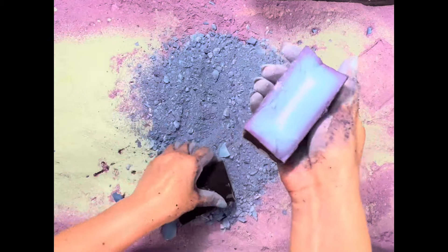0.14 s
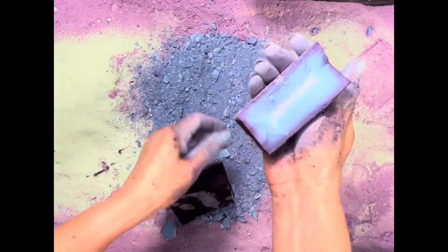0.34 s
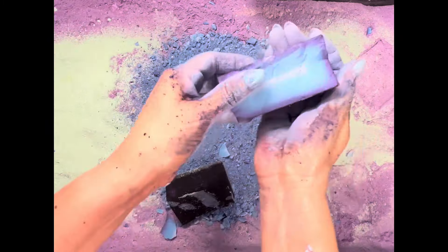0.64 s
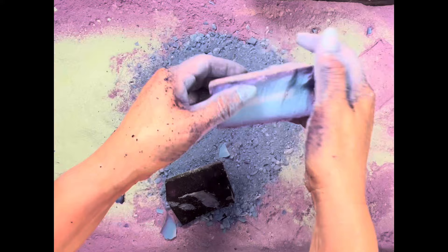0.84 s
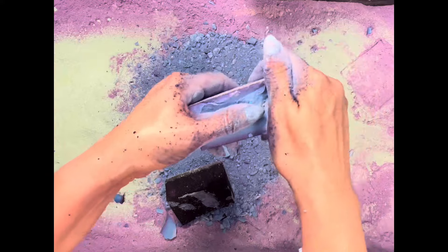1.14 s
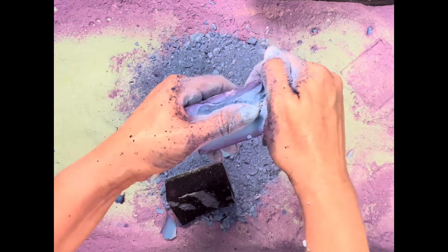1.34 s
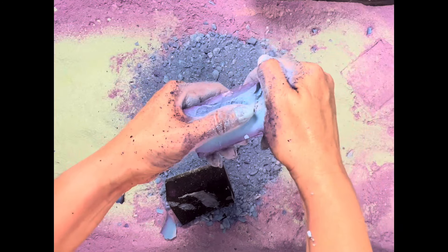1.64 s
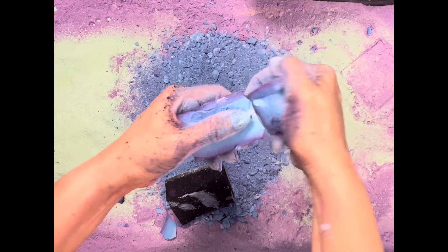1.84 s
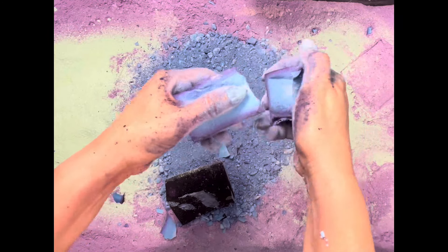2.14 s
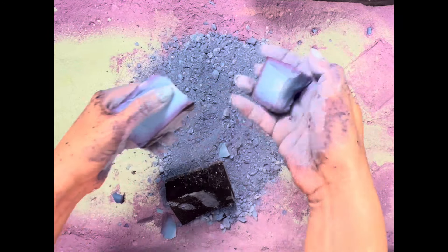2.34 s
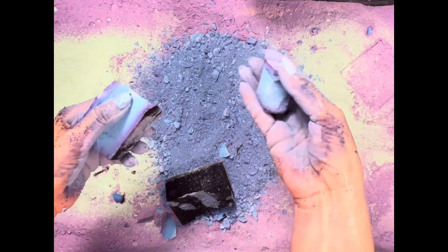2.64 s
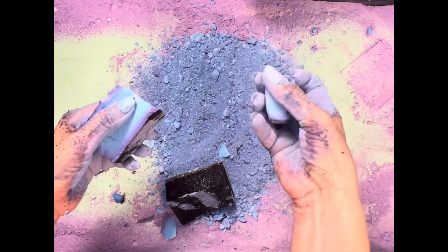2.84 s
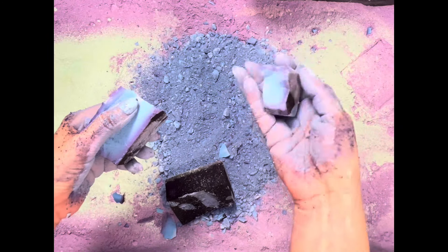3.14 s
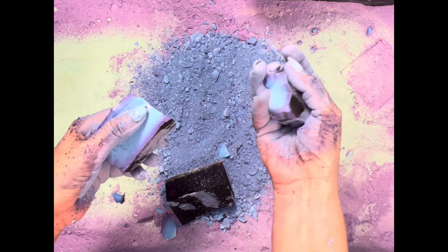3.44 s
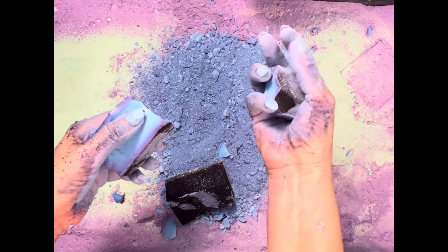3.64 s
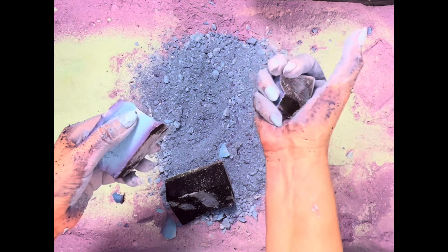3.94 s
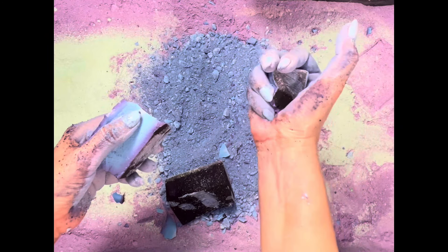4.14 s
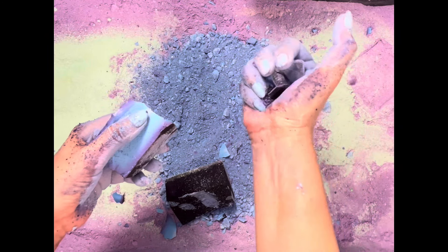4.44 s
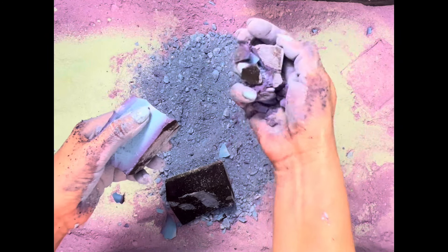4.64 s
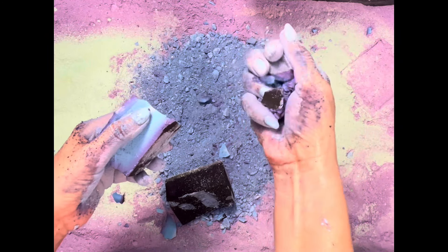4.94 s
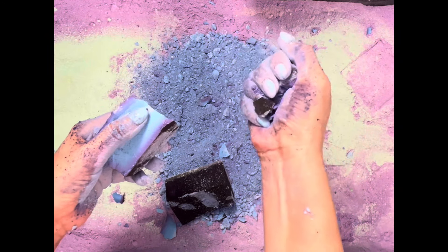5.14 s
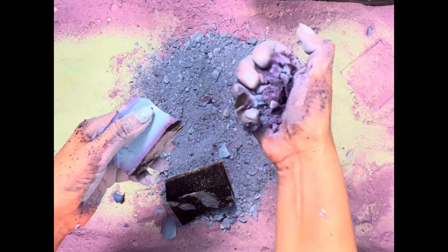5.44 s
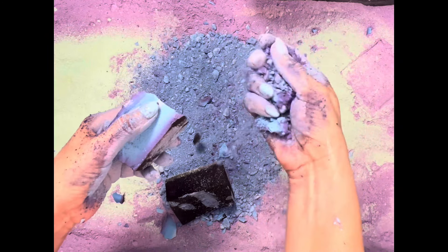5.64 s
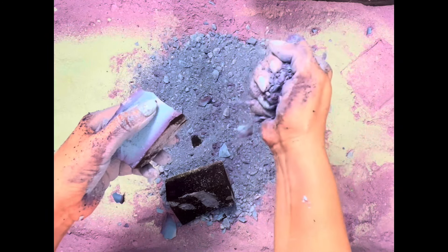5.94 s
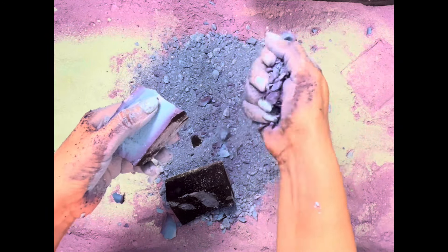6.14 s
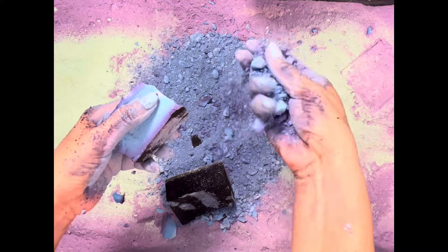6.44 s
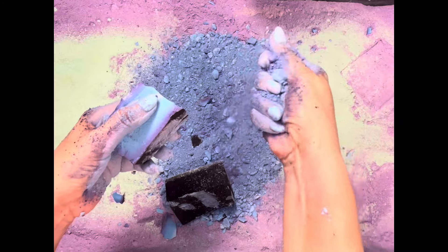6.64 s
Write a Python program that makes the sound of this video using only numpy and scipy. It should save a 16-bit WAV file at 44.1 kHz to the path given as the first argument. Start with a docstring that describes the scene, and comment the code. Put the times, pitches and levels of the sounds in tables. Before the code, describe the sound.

Dry chalk block rubbed by dusty fingers, cracked and loudly snapped in two, then crushed in a fist to gritty crumbs over low electrical hum.

```python
"""Chalk block snapped and crushed

Hands rub a dry block of gym chalk until it rings, snap it in two and crush one half in a fist.
Noise bursts make the breaks, filtered jolts the cracks, showers of tiny grains the crumbs, and
narrow-band tones the ringing chalk. The big breaks overload the microphone and wake a small room;
an electrical hum lies over low rumble and faint hiss."""
import sys
import numpy as np
from scipy import signal
from scipy.fft import rfft, irfft
from scipy.io import wavfile

SR = 44100
rng = np.random.default_rng(int(sys.argv[2]) if len(sys.argv) > 2 else 0)


def to_wav(sig):
    """Store sig (one row per channel, or 1-D mono) as 16-bit WAV at the path in sys.argv[1].

    Samples outside -1..1 are clipped; the rate is SR.
    """
    pcm = np.clip(np.atleast_2d(sig), -1, 1) * 32767
    pcm = np.round(pcm).astype(np.int16)
    wavfile.write(sys.argv[1], SR, pcm.T)  # frames by channels


N = 299880

# the block gives way: (time [s], level [dB], length [s], centre [Hz])
BREAKS = [(1.771, -15, 0.021, 6000), (1.777, -0.5, 0.01, 4260), (1.78, 9, 0.0056, 1530),
          (1.795, -4, 0.0027, 1460), (4.141, 6, 0.0017, 3100), (4.1454, 5, 0.0039, 2050),
          (4.152, 8, 0.00095, 3750), (4.915, -17.5, 0.019, 2250)]
# single cracks that stand out, all lifted later by CRACK_LIFT_DB:
# (time [s], level at 2-7 kHz [dB], lows relative to that [dB], highs relative to that [dB])
CRACKS = [(1.1523, -17, -18, -0.5), (1.1617, -32, -16, -10), (1.192, -32, -21, 4), (1.2, -22.5, -5, 7.5),
          (1.343, -22.5, -21, -2), (1.3751, -21, -20, -10), (1.4401, -29.5, -14, -5),
          (1.4676, -10, 1.5, -18), (1.4714, -2.5, -16, 0.5), (1.484, -17, -35, -5), (1.4946, -11, -26, 3),
          (1.4983, -15, -20, -12), (1.6278, -14, -14.5, -4), (1.66, -29, -20, 8),
          (1.6684, -22.5, -10.5, -24), (1.6753, -19, -5, -4), (1.7493, -27.5, -13, 4), (1.765, -5, -9, -1),
          (2.284, -32.5, -3, -3), (2.739, -23, -17, 0), (2.925, -41, -13, -4), (3.2055, -28, -11.5, -18),
          (3.2237, -29.5, -13, -9), (3.721, -19.5, -19, -4.5), (3.7372, -16.5, -17, -2),
          (3.8073, -22.5, -23, 0), (3.8259, -22.5, -19, 3), (3.9015, -17, -7, -4.5),
          (3.9234, -5.5, -13, -8.5), (4.0416, -24, -1, 2.5), (4.0491, -4.5, -17.5, -12.5),
          (4.1001, -13, -16.5, -5), (4.1603, -8.5, -9.5, 0), (4.202, -24, -2, -6),
          (4.2307, -7.5, -18, -5.5), (4.27, -22.5, -16.5, -11), (4.278, -24, -11.5, 5),
          (4.3068, -28.5, 3, 14.5), (4.7348, -27.5, -19, 1), (4.77, -31, -29, -1), (4.8212, -30, -1, -12),
          (4.8404, -25.5, -1, -19), (4.901, -14, -8, 1), (4.925, -18, -1, 5), (4.942, -23, -8, -20),
          (4.9873, -17, -9, 1), (5.003, -13, -21.5, -19), (5.0373, -6, -23, -12.5), (5.0558, -27, -18, -21),
          (5.1005, -5.5, -19, -24), (5.118, -10.5, -20, -28), (5.151, -24.5, -11.5, -7),
          (5.1593, -25.5, -18, -11), (5.2019, -16, -16, 7), (5.367, -36.5, -6, -1), (5.5727, -21, -8, -14),
          (5.593, -35, -7, -9), (5.619, -32, 1, -10), (5.645, -38, -8, -5), (5.787, -11, -10, 3.5),
          (5.809, -25, -29, -3), (5.835, -17, -19.5, 4), (5.9695, -27.5, -5.5, -16), (6.007, -16, 0, -4.5),
          (6.029, -32, -10, -20), (6.062, -36, -4, -15), (6.079, -33.5, -4, -16), (6.1252, -21.5, -13, 9),
          (6.146, -31, 0, -17), (6.2796, -19.5, 2, -18), (6.3075, -21, -20, -10), (6.35, -17.5, -2.5, -7),
          (6.388, -29, -15, -5), (6.5603, -25.5, -17, 8.5), (6.5898, -26, 4, -31), (6.6429, -22, -1, -13),
          (6.7756, -32.5, -7, -14)]
CRACK_LIFT_DB = 2.0
# squeezes of the fist; one whose end comes before its start is silent:
# (start [s], hardest [s], end [s], level [dB], swell [dB])
SQUEEZES = [(3.78, 3.83, 4.02, -31, 13), (4.058, 4.22, 4.35, -28.5, 14), (4.656, 4.932, 5.25, -29, 12),
            (5.314, 5.378, 5.42, -38.5, 15), (5.495, 5.624, 5.77, -30.5, 13), (5.731, 5.775, 5.81, -35, 6),
            (5.866, 5.894, 5.7, -31, 12), (6.267, 6.56, 6.74, -31.5, 9.5)]
# low crunch of the finer crumbs, ahead of the grinding mix: (time [s], level [dB])
CRUMBLING = [(3.5, -46), (4.3, -13), (4.8, -5), (6.1, 0.5), (6.8, 4.5)]
# fingers stroking the chalk: (start [s], length [s], level [dB], how freely the piece rings [0-1])
STROKES = [(0, 0.083, -36.5, 0), (0.124, 0.037, -39.5, 0.05), (0.334, 0.28, -43, 0.4),
           (0.693, 0.1, -29, 0.26), (0.825, 0.039, -32.5, 0.4), (0.894, 0.035, -32.5, 0.15),
           (0.957, 0.08, -34, 0.07), (1.042, 0.057, -29, 0), (1.95, 0.036, -34, 0.05),
           (2.029, 0.052, -28.5, 0), (2.246, 0.037, -36, 0), (2.366, 0.11, -42, 0.02),
           (2.593, 0.13, -30, 0.1), (2.75, 0.14, -34.5, 0.85), (2.988, 0.023, -24, 1),
           (3.008, 0.18, -39, 0.83), (3.23, 0.072, -22.5, 0.44), (3.324, 0.16, -42, 0.85),
           (3.556, 0.042, -28, 0.08), (4.441, 0.09, -31.5, 0.01), (4.601, 0.096, -33, 0)]
# a fingertip catches on an edge and lets go: (time [s], level [dB])
CATCHES = [(0.292, -39), (0.325, -33), (0.547, -29.5), (0.6935, -26.5), (2.0985, -28), (2.3148, -33),
           (2.336, -43), (2.462, -28), (2.5098, -26), (2.625, -27), (2.9835, -28.5), (3.067, -30),
           (3.393, -40)]
# the broken half skids on the skin: (time [s], level [dB], length [s])
SKIDS = [(2.679, -8, 0.025), (2.722, -17.5, 0.016), (2.736, -19, 0.037)]
# the half lies loose on the fingers and its lowest mode sounds: (start [s], end [s])
LOOSE_SPELLS = [(2.1, 2.22), (2.37, 2.52), (2.96, 3.15)]
# resonances of the whole block, then of the half: (frequency [Hz], width [Hz], relative level [dB])
WHOLE_MODES = [(3010, 62, -5.5), (4000, 180, -3.5), (5200, 110, -6.5), (5870, 220, 2.5), (6370, 170, 3),
               (8480, 300, -3.5)]
HALF_MODES = [(6620, 330, -3), (7960, 400, -2), (8800, 400, -10), (11500, 3700, -2)]
# the half's strongest resonance bends as the grip changes: (time [s], frequency [Hz])
SQUEAK_BEND = [(2.66, 4970), (2.79, 4810), (2.93, 4920), (3.25, 5010)]
# dull knocks of the hands, the lumps and the table:
# (time [s], level before rise and decay [dB], pitch [Hz], rise [s], decay [s])
THUMPS = [(.005, -16.5, 38.6, 0.0098, 0.11), (0.496, -11.5, 540, 0.000089, 0.00061),
          (1.783, 6.5, 148, 0.0014, 0.0034), (4.087, -9, 34.6, 0.014, 0.036),
          (4.147, 10, 102, 0.00096, 0.0058), (5.243, 4.5, 77, 0.012, 0.028), (5.374, 1.5, 82, 0.017, 0.013),
          (5.785, -8, 246, 0.00078, 0.0033), (6.28, -15.5, 475, 0.00076, 0.007)]

# spectra of the layers: (frequency [Hz], relative level per Hz [dB])
CRACK_COLOUR = [(60, -46), (300, 5), (800, -3), (2200, 0.5), (2650, -2.5), (5800, -1), (7500, 2.5),
                (10000, -6), (12000, -3), (15500, -8.5)]
GRIT_COLOUR = [(700, -14), (1500, -5.5), (2300, -4), (4500, -1.5), (5800, -6.5), (7500, -5), (10000, -12.5),
               (12500, -11.5), (15500, -22)]
CRUNCH_COLOUR = [(120, -19), (300, 1), (700, -1.5), (1500, -4.5), (2200, -7.5), (5000, -44)]
SKIN_COLOUR = [(300, 0), (1000, -7), (2500, -4), (4500, -2), (7000, 1.5), (10000, -6), (12000, -4),
               (15500, -7.5)]
RUSH_COLOUR = [(180, -43), (330, -9), (523, -2), (1370, -5), (2600, -10.5), (6840, -17), (15000, -29)]
ROOM_COLOUR = [(100, -8), (400, 16.5), (900, -14), (1450, -2.5), (2500, -4), (4600, -0.5), (7000, 1.5),
               (15500, 0)]
FLOOR_COLOUR = [(10, -0.5), (45, -1.5), (70, 0), (160, -9.5), (220, -14), (350, -24.5), (600, -29),
                (1100, -39.5), (2500, -43), (7000, -47), (15500, -50.5)]
# room decay by frequency: (frequency [Hz], time to fall 60 dB [s])
ROOM_T60 = [(200, 0.64), (1500, 0.48), (7000, 0.51), (15000, 0.24)]
# electrical hum: (frequency [Hz], rms level [dB])
HUM = [(58.5, -33), (120, -31.5), (240, -43.5), (294, -51)]

SNAP_S = 1.78  # from here on the hand holds one half of the block
GRIP_S = 0.0094  # the fingers take hold and let go in this time
# between squeezes the closed fist still stirs the crumbs faintly
FIST_FROM_S, FIST_REST_DB = 3.55, -46.5
# between strokes, until the fist closes, the fingers never rest entirely
HOLD_FROM_S, HOLD_DB = 0.18, -60.5
# how far through its length a stroke peaks, and the drop half a length from there
STROKE_PEAK, STROKE_ENDS_DB = 0.49, -9
CATCH_TICK_DB, CATCH_TICK_S, CATCH_DECAY_S, CATCH_RING = 6.5, 0.0019, 0.0081, 0.74
SQUEAK_WIDTH_HZ, SQUEAK_DB = 400, 5
LOW_MODE_HZ, LOW_MODE_WIDTH_HZ, LOW_MODE_DB = 1417, 130, -53
RUSH_DB, RUSH_RISE_S, RUSH_T60_S = -21.5, 0.0046, 0.51
# the ring within the rush, its level relative to the rush
RUSH_RING_HZ, RUSH_RING_WIDTH_HZ, RUSH_RING_DB = 1490, 190, -8
FLOOR_DB = -27.5
EDGE_HZ = 15850  # upper band limit


def breaks(fade_s=0.0011, slope_db=7, patchy_db=3, size=3000):
    """Each break is a noise burst for dense fractures, peaking at its centre and falling per octave."""
    out, t = np.zeros(N), np.arange(size) / SR
    for time, db, length, centre_hz in BREAKS:
        octaves_away = abs(np.log2((bins() + 50) / centre_hz))
        colour = -slope_db * octaves_away + patchy_db * fragment()
        # keep the middle of the filtered noise, where the filter has settled
        tear = unit(signal.fftconvolve(rng.standard_normal(2 * size), causal(colour))[size:2 * size])
        hold_then_fade = np.exp(-np.maximum(t - length, 0) / fade_s)
        add(out, time, amp(db) * tear * hold_then_fade)
    return out


def freed_halves(snaps):
    """The breaks set off the lowest bending mode of the freed halves."""
    return amp(3) * resonate(snaps, hz=1430, width_hz=150)


def cracks(run_s=0.00045, run_db=5, scatter_s=0.0053, scatter_db=-3, patchy_db=3.0, size=1500):
    """A crack starts with a jolt, tears on briefly, and scatters off the hands and the table."""
    out, t, hz = np.zeros(N), np.arange(size) / SR, bins()
    middle = signal.butter(2, [2000, 7000], "band", fs=SR, output="sos")
    for time, db, low_db, high_db in CRACKS:
        tear = rng.standard_normal(size) * np.exp(-t / run_s)
        scatter = rng.standard_normal(size) * np.exp(-t / scatter_s)
        force = amp(run_db) * tear / np.linalg.norm(tear)
        force += amp(scatter_db) * scatter / np.linalg.norm(scatter)
        force[0] += 1  # the jolt
        tilt = read([(150, low_db), (1300, low_db + 6.0), (4000, 0), (5200, 0), (10000, high_db)], hz)
        colour = read(CRACK_COLOUR, hz) + tilt + patchy_db * fragment()
        click = signal.fftconvolve(force, causal(colour))
        # mid-band energy, spread over 5 ms
        level = np.sqrt(np.sum(signal.sosfilt(middle, click) ** 2) / (.005 * SR))
        add(out, time, amp(db) * click / level)
    return amp(CRACK_LIFT_DB) * out


def hard_lump(clicks):
    """The last hard lump rings briefly each time it splits."""
    t = np.arange(N) / SR
    splitting = (t > 4.98) & (t < 5.18)
    return amp(-0.5) * resonate(clicks * splitting, hz=4330, width_hz=900)


def grinding():
    """Crumbs give way in the fist: sharp grit, soft powder, and a duller crunch from inside the palm."""
    t = np.arange(N) / SR
    pressure = sum(squeeze(*row) for row in SQUEEZES)
    pressure = np.maximum(pressure, amp(FIST_REST_DB) * (t > FIST_FROM_S))
    crunch_db = np.interp(t, *np.transpose(CRUMBLING))
    clumps = amp(2.5 * wander(N, 60))
    grit = amp(1.0) * grains(GRIT_COLOUR, per_s=420, spread_db=6.0, patchy_db=6.0, tear_s=0.00099)
    crunch = grains(CRUNCH_COLOUR, per_s=230, spread_db=3.0, patchy_db=5, tear_s=0.0017)
    powder = amp(-6.0) * noise(GRIT_COLOUR)
    return pressure * clumps * (grit + powder + amp(crunch_db - 4.0) * crunch)


def squeeze(start, hardest, end, db, swell_db):
    """Pressure builds steadily in dB to its hardest point, then eases off."""
    t = np.arange(N) / SR
    grip = np.clip(np.minimum(t - start, end - t) / GRIP_S, 0, 1)
    return grip * amp(db + np.interp(t, [start, hardest, end], [-swell_db, 0, -swell_db]))


def rubbing():
    """Dusty skin catches and slips on the chalk: a fine hiss, plus the ring of the piece held."""
    t = np.arange(N) / SR
    hiss = 0.56 * noise(SKIN_COLOUR) * amp(2 * wander(N, 83))
    slips = hiss + 0.43 * grains(SKIN_COLOUR, per_s=3000, spread_db=7.5, patchy_db=7.0, tear_s=0.00033)
    touches = [(time, amp(db) * stroke(time, length), free) for time, length, db, free in STROKES]
    touches += [(time, amp(db) * catch(time), CATCH_RING) for time, db in CATCHES]
    friction, whole, half, skid, loose = np.zeros((5, N))
    for time, force, free in touches:
        # each touch shares its power between hiss and ring
        friction += force * np.sqrt(1 - free)
        held = whole if time < SNAP_S else half
        held += force * np.sqrt(free)
    for time, db, length in SKIDS:
        add(skid, time, amp(db) * signal.windows.tukey(round(length * SR), .8))
    for start, end in LOOSE_SPELLS:
        add(loose, start, signal.windows.tukey(round((end - start) * SR)))
    # a skid tears grit off the edge
    scrape = 0.59 * skid * noise(GRIT_COLOUR)
    hold = amp(HOLD_DB + 2 * wander(N, 4.3)) * (t > HOLD_FROM_S) * (t < FIST_FROM_S)
    squeak = (np.interp(t, *np.transpose(SQUEAK_BEND)), SQUEAK_WIDTH_HZ, SQUEAK_DB)
    # the skin sticks and slips, so the squeak comes in fits
    fits = unit(amp(4 * wander(N, 45)))
    half_pressure = fits * (half + .5 * hold * (t > SNAP_S)) + 0.5 * skid
    half_ring = ring(half_pressure, HALF_MODES + [squeak])
    low_ring = ring(amp(LOW_MODE_DB) * loose, [(LOW_MODE_HZ, LOW_MODE_WIDTH_HZ, 0)])
    return slips * (friction + hold) + scrape + ring(whole, WHOLE_MODES) + half_ring + low_ring


def stroke(start, length):
    """A finger speeds up and slows down again: one smooth bell."""
    u = 2 * ((np.arange(N) / SR - start) / length - STROKE_PEAK)
    return amp(np.maximum(STROKE_ENDS_DB * u ** 2, -120))


def catch(start):
    """A caught fingertip lets go with a tick, then slips briefly to rest."""
    out, t = np.zeros(N), np.arange(SR // 10) / SR
    add(out, start, amp(CATCH_TICK_DB) * np.exp(-t / CATCH_TICK_S) + np.exp(-t / CATCH_DECAY_S))
    return out


def ring(pressure, modes):
    """Friction drives the chalk's resonances; each swells, fades and bends as the grip shifts."""
    out = np.zeros(N)
    for hz, width, db in modes:
        phase = 2 * np.pi * np.cumsum(hz * (1 + .012 * wander(N, 16))) / SR
        # two wandering quadratures spread the tone into a narrow band
        tone = wander(N, .8 * width) * np.cos(phase) + wander(N, .8 * width) * np.sin(phase)
        out += amp(db + 3 * wander(N, 30)) * tone
    return pressure * unit(out)


def thumps():
    """Soft blows, each one quickly damped swing."""
    out, t = np.zeros(N), np.arange(SR // 2) / SR
    for time, db, hz, rise, decay in THUMPS:
        envelope = (1 - np.exp(-(t / rise) ** 2)) * np.exp(-t / decay)
        add(out, time, -amp(db) * np.sin(2 * np.pi * hz * t) * envelope)
    return out


def rush():
    """The snap leaves a warm rush that fades smoothly, tinged by the lowest mode of the halves."""
    age = np.maximum(np.arange(N) / SR - SNAP_S, 0)
    fade = amp(RUSH_DB - 60 * age / RUSH_T60_S) * (1 - np.exp(-age / RUSH_RISE_S))
    tinge = ring(amp(RUSH_RING_DB) * fade, [(RUSH_RING_HZ, RUSH_RING_WIDTH_HZ, 0)])
    return fade * noise(RUSH_COLOUR) + tinge


def room(x, turns_per_s=55):
    """A diffuse tail, quickest to die in the top treble; the sound turns through four different tails."""
    out, turn = np.zeros(N), 2 * np.pi * turns_per_s * np.arange(N) / SR
    for quarter in range(4):
        hz, t, z = signal.stft(rng.standard_normal(SR * 2 // 3), SR, nperseg=256)
        decay_db = read(ROOM_COLOUR, hz)[:, None] - 60 * t / read(ROOM_T60, hz)[:, None]
        onset = 1 - np.exp(-t / 0.00082)
        tail = signal.istft(z * amp(decay_db) * onset, SR, nperseg=256)[1]
        facing = np.maximum(np.cos(turn + quarter * np.pi / 2), 0)
        out += signal.oaconvolve(x * facing, tail / np.linalg.norm(tail))[:N]
    return out


def background():
    """A slightly wavering hum over low rumble and faint hiss."""
    t, hum = np.arange(N) / SR, np.zeros(N)
    for hz, db in HUM:
        phase = 2 * np.pi * (hz * t + rng.random()) + 0.063 * wander(N, 17)
        hum += amp(db) * np.sqrt(2) * np.sin(phase) * amp(0.31 * wander(N, 1.9))
    return amp(FLOOR_DB) * noise(FLOOR_COLOUR) + hum


def grains(colour, per_s, spread_db, patchy_db, tear_s, count=24, size=300):
    """Tiny fractures of random size, each a short tear through one of many differently ringing fragments."""
    strength = amp(spread_db * np.minimum(rng.exponential(1, N), 3.5))
    force = strength * rng.choice([-1, 1], N) * (rng.random(N) < per_s / SR)
    which, out = rng.integers(0, count, N), np.zeros(N)
    for k in range(count):
        # brittle crumbs tick, soft ones tear for longer
        length = tear_s * 2 ** rng.uniform(-0.64, 1)
        tear = rng.standard_normal(size) * np.exp(-np.arange(size) / SR / length)
        grain = signal.fftconvolve(tear, causal(read(colour, bins()) + patchy_db * fragment(1430)))
        out += signal.oaconvolve(force * (which == k), unit(grain))[:N]
    return unit(out)


def fragment(width_hz=900):
    """Each piece of chalk has its own peaks and dips along frequency."""
    knots = np.arange(0, SR, width_hz)
    return np.interp(bins(), knots, rng.standard_normal(len(knots)))


def resonate(x, hz, width_hz):
    """A single resonance driven by x."""
    return signal.lfilter(*signal.iirpeak(hz, hz / width_hz, fs=SR), x)


def noise(colour):
    """Steady noise of rms 1 with the given spectrum."""
    return unit(irfft(rfft(rng.standard_normal(N)) * amp(read(colour, bins(N))), N))


def wander(size, rate):
    """Smooth random drift of rms 1 that changes about rate times a second."""
    smoothing = np.exp(-(bins(size) / rate) ** 2)
    return unit(irfft(rfft(rng.standard_normal(size)) * smoothing, size))


def causal(db):
    """Minimum-phase response with the given gain on bins(): all ringing follows the blow."""
    cepstrum = irfft(db * np.log(10) / 20)
    half = len(cepstrum) // 2
    cepstrum[1:half] *= 2
    cepstrum[half + 1:] = 0
    return irfft(np.exp(rfft(cepstrum)))


def read(points, hz):
    """A spectrum joined by straight lines on a log-frequency axis."""
    f, value = np.transpose(points)
    return np.interp(np.log(hz + 1), np.log(f + 1), value)


def bins(size=2048):
    """Frequencies of a real spectrum, in Hz."""
    return np.fft.rfftfreq(size, 1 / SR)


def amp(db):
    """Decibels to amplitude."""
    return 10 ** (np.asarray(db) / 20)


def unit(x):
    """Scale to rms 1."""
    return x / np.sqrt(np.mean(x ** 2) + 1e-20)


def add(mix, time, sound):
    """Lay a sound into the mix at a time in seconds."""
    part = mix[max(round(time * SR), 0):][:len(sound)]
    part += sound[:len(part)]


def scene():
    """All layers in one channel; breaks, cracks and rubbing also feed the room."""
    snaps, clicks, rub = breaks(), cracks(), rubbing()
    # the first break is in the open; the later one is shut in the fist, which damps ring and room
    openness = amp(np.interp(np.arange(N) / SR, [2, 4], [0, -10]))
    open_snaps = snaps * openness
    halves, lump = freed_halves(open_snaps), hard_lump(clicks)
    echo = room(amp(-31.5) * (clicks + lump) + amp(-25) * rub + amp(-24) * (open_snaps + halves))
    chalk = snaps + halves + clicks + lump + grinding() + rub
    return (chalk + thumps() + rush() + echo + background())[None]


def record(dry):
    """The input overloads, flattening peaks beyond full scale; then the band limit."""
    clipped = np.clip(dry, -1, 1)
    lowpass = signal.firwin(255, EDGE_HZ, window=("kaiser", 8), fs=SR)
    return signal.oaconvolve(clipped, lowpass[None], "same")


dry = scene()
out = record(dry)
to_wav(out)
```